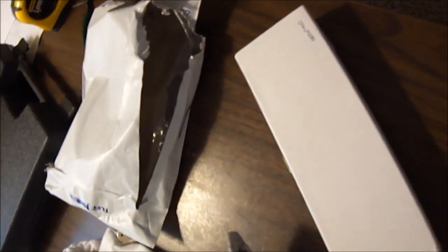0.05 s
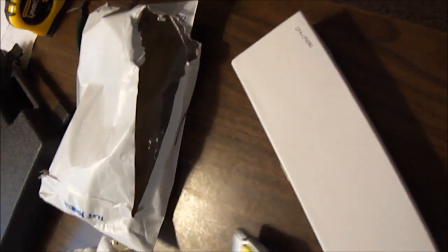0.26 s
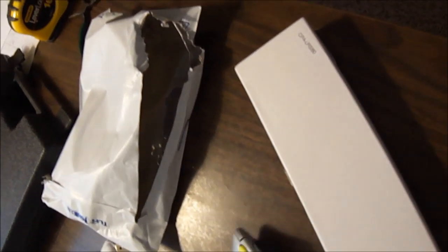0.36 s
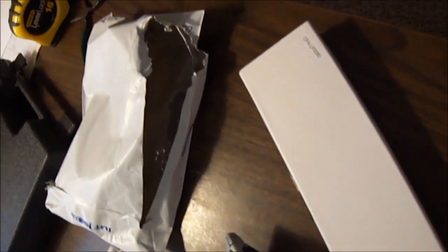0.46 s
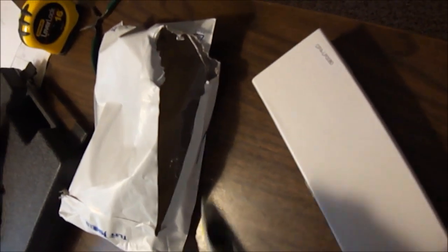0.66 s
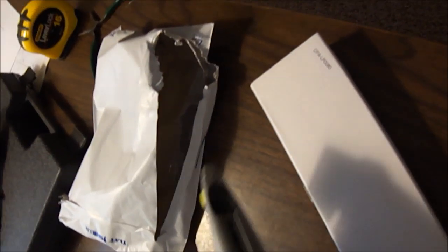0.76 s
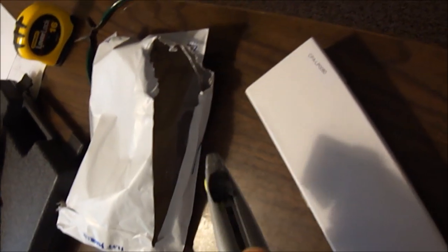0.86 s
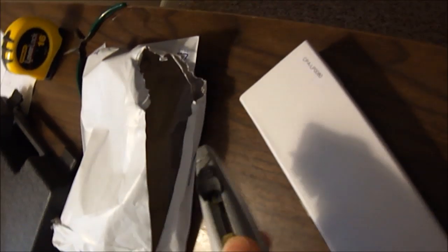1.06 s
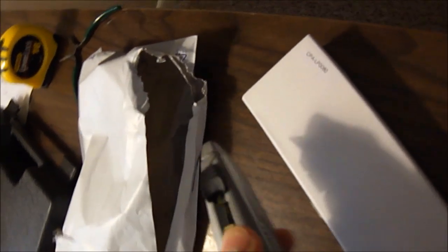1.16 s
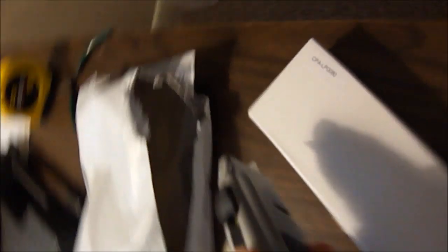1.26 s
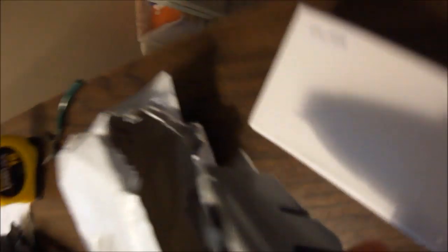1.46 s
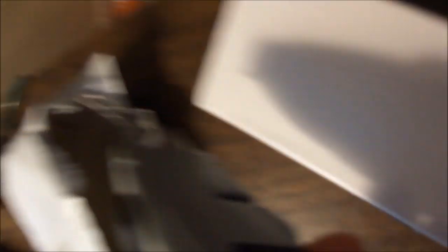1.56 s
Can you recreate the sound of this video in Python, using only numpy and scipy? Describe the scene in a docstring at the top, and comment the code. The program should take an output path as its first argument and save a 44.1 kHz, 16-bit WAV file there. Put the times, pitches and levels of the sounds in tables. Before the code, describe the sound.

A small hand tool knocks twice on a wooden table, clatters as it is picked up, then ticks in the hand and snaps twice. Close-miked in a small, quiet room with faint hiss.

```python
"""Hand tool on a wooden table

A small tool ticks, knocks twice on a table, clatters, is picked up, ticks in the hand and snaps twice.
Every contact is a short crack: knocks ring the wood, light touches ring the tool's own body, and the
snaps of its mechanism leave a springy ring. Close-miked in a small, quiet room with hiss and a low
rumble; a limiter ducks after the loudest hits."""
import sys
import numpy as np
from scipy import signal
from scipy.fft import rfft, irfft
from scipy.io import wavfile
from scipy.ndimage import uniform_filter1d, map_coordinates

SR = 44100
rng = np.random.default_rng(int(sys.argv[2]) if len(sys.argv) > 2 else 0)


def generate_wav(sig):
    """Save sig (samples, or channels by samples) to the path in sys.argv[1] as 16-bit PCM at SR."""
    pcm = np.round(np.clip(np.atleast_2d(sig).T, -1, 1) * 32767).astype(np.int16)
    wavfile.write(sys.argv[1], SR, pcm)


N = 70560
T = np.arange(N) / SR


def amp(db):
    """Decibels to gain."""
    return 10 ** (np.asarray(db) / 20)


def unit(x):
    """Scale to an energy of one."""
    return x / np.sqrt(np.sum(x ** 2))


def fade(t60):
    """Exponential decay by 60 dB in t60 seconds."""
    return np.exp(-np.log(1000) * T / t60)


def delay(x, seconds):
    """Start a sound later, padded or trimmed to the scene's length."""
    return np.concatenate([np.zeros(int(seconds * SR)), x, np.zeros(N)])[:N]


def eq(x, curve, size=4096):
    """Minimum-phase EQ through (f/Hz, gain/dB) points: nothing rings ahead of an attack."""
    hz, db = np.array(curve, float).T
    bin_hz = np.maximum(np.arange(size // 2 + 1) * SR / size, 1)
    gain = amp(np.interp(np.log(bin_hz), np.log(hz), db))
    cepstrum = irfft(np.log(gain))
    cepstrum[1:size // 2] *= 2
    cepstrum[size // 2 + 1:] = 0
    impulse = irfft(np.exp(rfft(cepstrum)))
    return signal.fftconvolve(x, impulse)[:len(x)]


def ring(modes):
    """A struck object rings as decaying sines of alternating polarity."""
    return sum((-1) ** k * amp(db) * np.sin(2 * np.pi * hz * T) * fade(t60)
               for k, (hz, db, t60) in enumerate(modes))


def diffuse(curve, low_t60, high_t60, split_hz, rise_s):
    """A wash of overlapping resonances swells and dies away, with a decay time each for lows and highs."""
    noise = rng.standard_normal(N)
    lows = signal.sosfiltfilt(signal.butter(2, split_hz, fs=SR, output="sos"), noise)
    tail = lows * fade(low_t60) + (noise - lows) * fade(high_t60)
    attack = 1 - np.exp(-T / rise_s)
    return eq(unit(tail * attack), curve)


# Tone of the hiss: f/Hz, relative level/dB
HISS_EQ = [(15, -51), (25, -20), (71, -16.5), (212, -7), (303, -10.5), (721, -9.5), (1110, -12),
           (1260, -12), (1590, -13.5), (3500, -19.5), (3970, -19.5), (4290, -21), (11000, -26.5),
           (14300, -81), (22000, -120)]


def room_tone(hiss_db=-52, rumble_db=-57, rumble_hz=205, width_hz=38):
    """A bed of steady hiss and narrow low rumble, like a distant fan."""
    hiss = eq(rng.standard_normal(N), HISS_EQ)
    resonance = signal.iirpeak(rumble_hz, rumble_hz / width_hz, fs=SR)
    rumble = signal.lfilter(*resonance, rng.standard_normal(N))
    return np.sqrt(N) * (amp(hiss_db) * unit(hiss) + amp(rumble_db) * unit(rumble))


# Centres of a crack's five EQ bands: f/Hz
CRACK_BANDS = [450, 1200, 2500, 5200, 9500]
# Colour shared by every crack: f/Hz, gain/dB
CRACK_EQ = [(60, -17), (250, 0.5), (2800, -2.5), (3300, -3), (4400, -2), (5500, -1.5), (6500, -4.5),
            (8500, -2.5), (10000, -2.5), (11000, -4.5)]


def crack(t60, bands_db, bass_db, grit, size=2048):
    """One contact: a clean click plus `grit` times as much rough noise, coloured by its hardness."""
    contact = grit * unit(rng.standard_normal(size) * fade(t60)[:size])
    contact[0] += 1
    spectrum, hz = rfft(contact), np.arange(size // 2 + 1) * SR / size
    lag_s = 0.000709 / np.sqrt(hz / 1000 + 1e-9)  # treble travels faster through the material
    smeared = irfft(spectrum * np.exp(-4j * np.pi * lag_s * hz))
    power = uniform_filter1d(np.abs(spectrum) ** 2, 31)
    flattened = eq(smeared, np.column_stack([hz[1:], -10 * np.log10(power[1:])]))
    hardness = [(90, bands_db[0] + bass_db), *zip(CRACK_BANDS, bands_db)]  # bass rides on the lowest band
    return eq(eq(unit(flattened), hardness), CRACK_EQ)


# Modes of the tool's body: f/Hz, level/dB, t60/s
BODY_MODES = [(1239, -30, 0.079), (2150, -18, 0.026), (2306, -24.5, 0.066), (2614, -34.5, 0.036),
              (3500, -20.5, 0.022), (4360, -37, 0.035), (6860, -28.5, 0.027), (8800, -30, 0.013),
              (10400, -43, 0.077)]
# Bright ping of a small metal piece, also layered into knocks and snaps: f/Hz, level/dB, t60/s
PING_MODES = [(5210, -19.5, 0.0096), (5370, -24.5, 0.0053), (4060, -31, 0.015), (4280, -31.5, 0.0061),
              (5810, -31, .008)]
# Tick and clatter cues: t/s, crack t60/s, five band levels/dB, body ring/dB, ping/dB
TICK_CUES = [(0.0796, 0.016, -24, -47, -10.5, -17, -14.5, -60, -36),
             (0.1220, 0.02, -36, -34, -23, -17, -20, -57.5, -25),
             (0.2408, 0.02, -1, -2, -26, 8, 15.5, -13, -20), (0.4335, 0.036, -20, 5, 9, 3.5, 1, -14, -20),
             (0.4455, 0.031, -20, 2, -11, 5.5, 4, -35, -27),
             (0.447, 0.025, -15, -20, 21, -10, -4.5, 4, -10), (0.4661, 0.015, -22, -30, 0, 5, -22, 1.5, -8),
             (0.477, 0.0047, -22, -19, 17.5, 1.5, 4, -14, -22),
             (0.4768, 0.022, -19.5, 14.5, -9, 7.5, 5.5, -2, -15),
             (0.5046, 0.022, -35, -15, -4, -12.5, -12, -17, -22),
             (0.5767, 0.012, -48, -34, -28, -17, -33, -50, -42),
             (0.6503, 0.013, -22, -35, -6, -9, -7.5, -21.5, -8),
             (0.7933, 0.024, -38, -9, -11, -5, -15.5, -23.5, -29),
             (0.8400, 0.01, -13, -49, -22, -7, -21.5, -33, -28),
             (0.846, 0.0057, -43, -34, -26, -33, -21, -49, -1),
             (1.0175, 0.03, -1.5, -8, 2, -12, -5, -30, -22),
             (1.0343, 0.0072, -29, -3, 5, 20.5, 21, -20, -9),
             (1.0660, 0.014, -46, -30, 1.5, 5, 0, -16, -29),
             (1.2546, 0.02, -17, -16, -33, -9.5, -12, -21, -30),
             (1.2781, 0.0066, -24, -18, -16, -9.5, -2, -21, -26),
             (1.2934, 0.02, -27, -26, -11, -11, -9, -27, -22),
             (1.3071, 0.0093, -39, -3, -7, -12, -3, -20, -24),
             (1.3111, 0.011, -26, 0, -16, -7, -9, -22, -28),
             (1.3154, 0.036, -36, -39, 2, -0.5, -14, -19, -27),
             (1.3416, 0.0061, -5.5, 2, -6, 20.5, -26, -7, -32),
             (1.4214, 0.0083, -32, -37, -7, -12, -33, -17.5, -30),
             (1.5119, .012, -77, -14, -2.5, -25, -3.5, -22.5, -6.5)]


def tool_ticks(detune=0.02, ring_samples=8192):
    """Loose parts of the tool touch, ringing its body and a small metal piece."""
    body, ping, out = ring(BODY_MODES), ring(PING_MODES), np.zeros(N)
    for start, t60, *bands_db, body_db, ping_db in TICK_CUES:
        pitch = 1 + detune * rng.uniform(-1.07, 1)  # the grip shifts the body's pitch
        gripped = map_coordinates(body[:2 * ring_samples], [np.arange(ring_samples) * pitch])
        out += delay(crack(t60, bands_db, bass_db=-17, grit=6.9), start)
        out += delay(amp(body_db) * gripped, start) + delay(amp(ping_db) * ping, start)
    return out


# Distinct modes of the table: f/Hz, level/dB, t60/s
TABLE_MODES = [(241.5, -32, 0.35), (274.8, -23.5, 0.27), (468, -17.5, 0.11), (533.5, -16, 0.136),
               (624, -18, 0.21), (664.7, -16.5, 0.21), (716, -43.5, .35), (820, -21, 0.17),
               (944, -34, 0.48), (983, -29, 0.15), (1115, -45, 0.72), (1464, -26.5, 0.34),
               (1658, -25, 0.17), (1667, -26, 0.33)]
# Woody wash of the table's dense modes: f/Hz, gain/dB
WOOD_EQ = [(100, -42), (170, 2), (260, 21.5), (600, 30), (1000, 26), (1600, 24), (2600, 16.5), (3300, 5.5),
           (5500, 0), (10000, -25)]
# Heavy knock cues: t/s, crack t60/s, five band levels/dB, bass offset/dB, table ring/dB, ping/dB
KNOCK_CUES = [(0.2367, 0.025, 34, 26.8, 27.5, 25.9, 10, -28, -6.5, 25),
              (0.2574, 0.028, 25.2, 26, 31.1, 14.4, 15.1, -38, 4, -4)]
# Bounces on the wood: t/s, level/dB relative to the second knock's crack
BOUNCE_CUES = [(0.263, -32), (0.2656, -8), (0.2685, -23), (0.272, -26), (0.2958, -34)]


def table_knocks(grit=4.1):
    """Two knocks ring the table; the tool chatters to rest after the second."""
    wood = ring(TABLE_MODES) + diffuse(WOOD_EQ, low_t60=0.28, high_t60=0.28, split_hz=3900, rise_s=0.001)
    ping, out = ring(PING_MODES), np.zeros(N)
    for start, t60, *bands_db, bass_db, wood_db, ping_db in KNOCK_CUES:
        out += delay(crack(t60, bands_db, bass_db, grit), start)
        out += delay(amp(wood_db) * wood + amp(ping_db) * ping, start)
    _, t60, *bands_db, _, _, _ = KNOCK_CUES[-1]
    for start, db in BOUNCE_CUES:  # the second knock's colour, tighter and thinner
        out += amp(db) * delay(crack(t60 / 2, bands_db, bass_db=-43, grit=grit), start)
    return out


# Modes of the spring: f/Hz, level/dB, t60/s
SPRING_MODES = [(1990, -51.5, 0.23), (3335, -58, 0.28), (3680, -48, 0.16), (5000, -63, 0.27)]
# Sharp snap cues: t/s, crack t60/s, five band levels/dB, bass offset/dB, ping/dB, spring ring/dB
SNAP_CUES = [(1.0304, 0.0071, 2, 25.1, 29.4, 24.8, 23.8, 20, 2.4, 9),
             (1.3445, 0.0096, -8, 15.1, 14, 23.5, 22.2, 11, 21.8, 17)]


def tool_snaps():
    """The mechanism snaps home with a ping and leaves a faint springy ring."""
    ping, spring, out = ring(PING_MODES), ring(SPRING_MODES), np.zeros(N)
    for start, t60, *bands_db, bass_db, ping_db, spring_db in SNAP_CUES:
        out += delay(crack(t60, bands_db, bass_db, grit=2.23), start)
        out += delay(amp(ping_db) * ping + amp(spring_db) * spring, start)
    return out


# Early reflections off things nearby: t/s, level/dB
REFLECTIONS = [(.0043, -26.5), (.0072, -21.5), (0.0106, -19.5)]
# Tone of the reverb tail: f/Hz, gain/dB
REVERB_EQ = [(100, -16), (500, -41.5), (1200, -19), (2200, -21), (4000, -15.5), (7000, -18), (10500, -20)]


def small_room(direct, send):
    """The direct sound with a few close reflections and a short tail fed by the send."""
    early = sum(amp(db) * delay(direct, lag_s) for lag_s, db in REFLECTIONS)
    tail = diffuse(REVERB_EQ, low_t60=0.37, high_t60=0.34, split_hz=2700, rise_s=0.0017)
    return direct + early + signal.fftconvolve(send, tail)[:N]


def limiter(x, rms_ceiling=0.33, release_s=0.045, clip_level=0.88, window=33):
    """Duck at each overload, recover smoothly and clip what slips through."""
    rms = np.sqrt(np.abs(uniform_filter1d(x ** 2, window)))
    overload = np.log(np.maximum(rms / rms_ceiling, 1))
    release = np.exp(-T / release_s)
    reduction = np.maximum.accumulate(overload / release, axis=-1) * release
    gain = np.exp(-uniform_filter1d(reduction, window))
    return np.clip(x * gain, -clip_level, clip_level)


def scene():
    """Mono mix of the tool's sounds in the room, over the room tone."""
    knocks, ticks, snaps = table_knocks(), tool_ticks(), tool_snaps()
    reverb_send = amp(1) * ticks + amp(1.5) * knocks + snaps
    return (small_room(ticks + knocks + snaps, reverb_send) + room_tone())[None]


def record(dry):
    """Output chain: high cut, limiter, and the same high cut again."""
    high_cut = signal.firwin(301, 11200, window=("kaiser", 10), fs=SR)[None]
    limited = limiter(signal.fftconvolve(dry, high_cut, "same"))
    return signal.fftconvolve(limited, high_cut, "same")


dry = scene()
out = record(dry)
generate_wav(out)
```